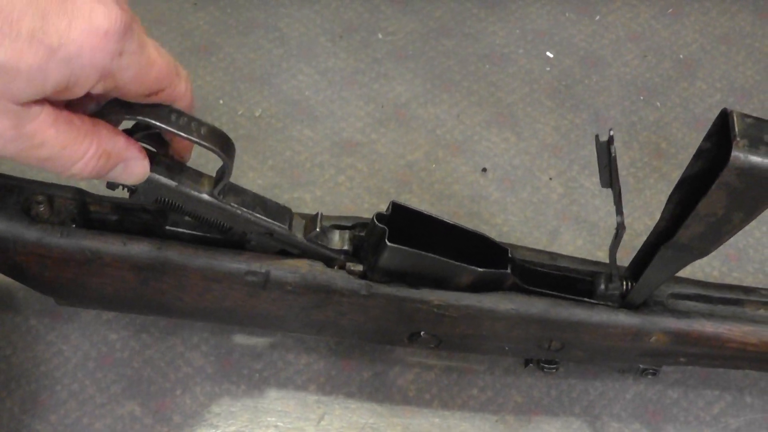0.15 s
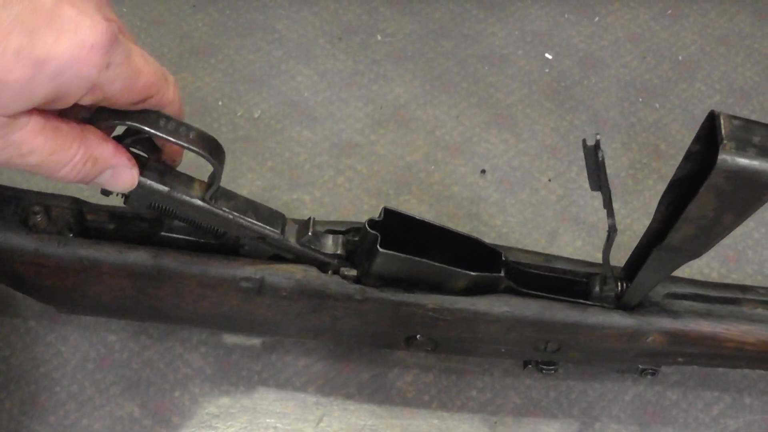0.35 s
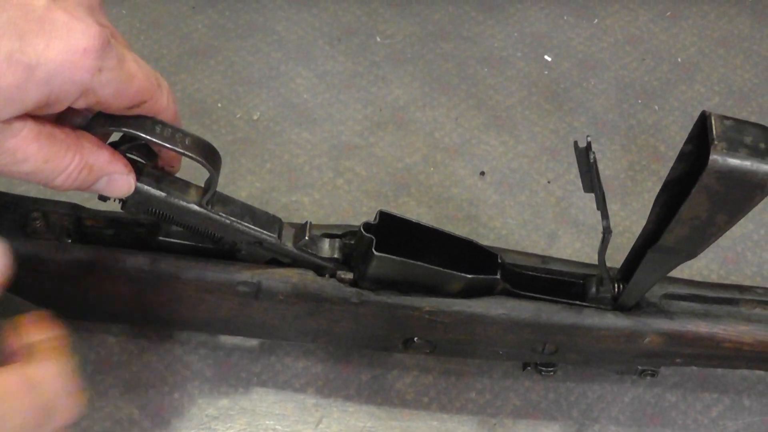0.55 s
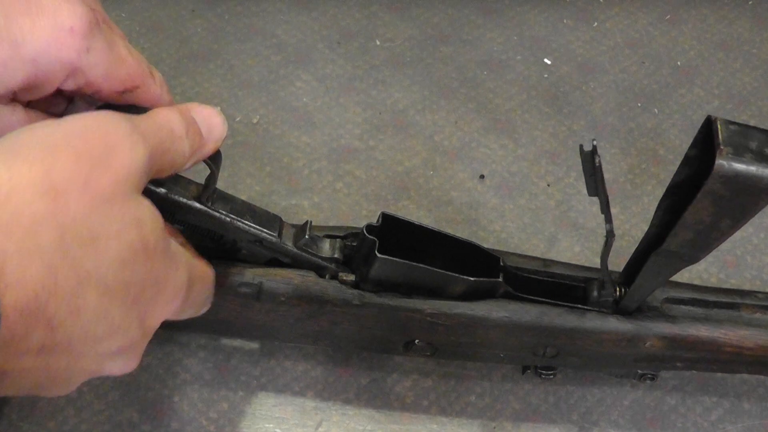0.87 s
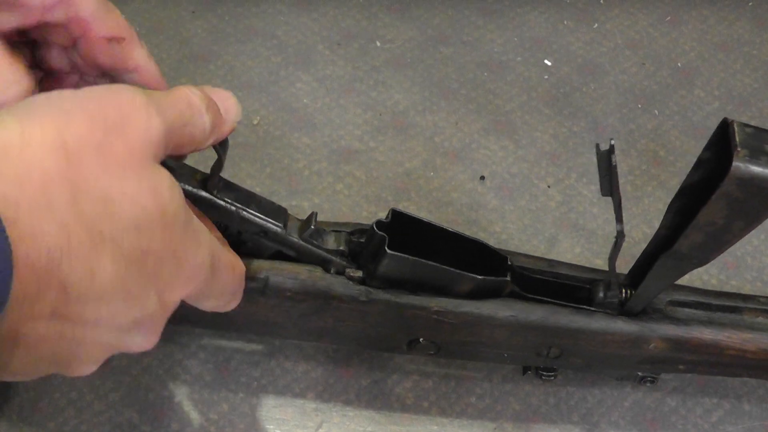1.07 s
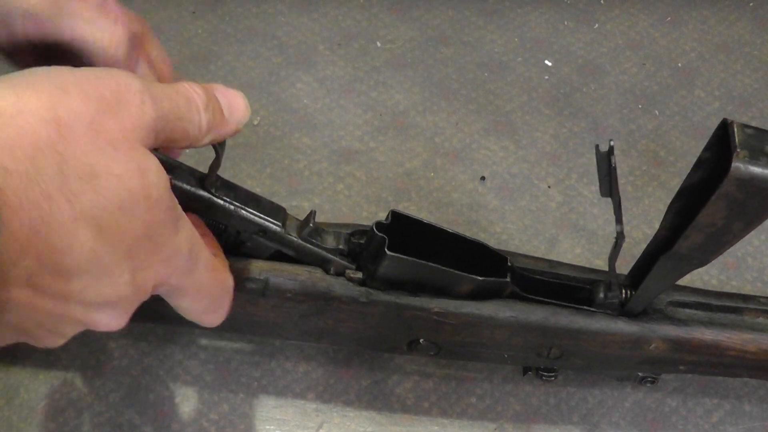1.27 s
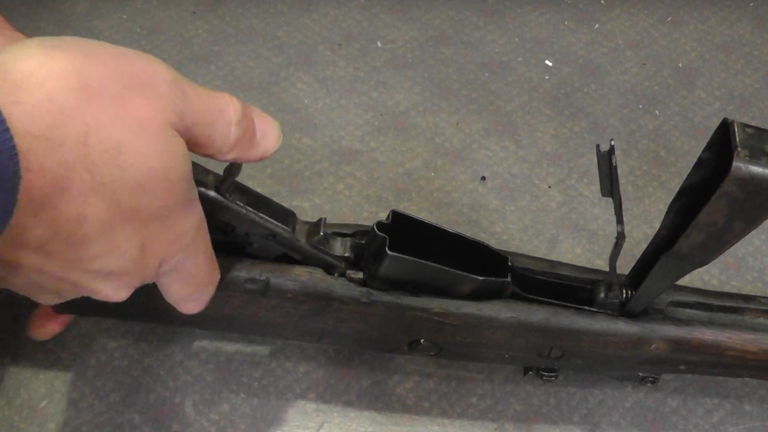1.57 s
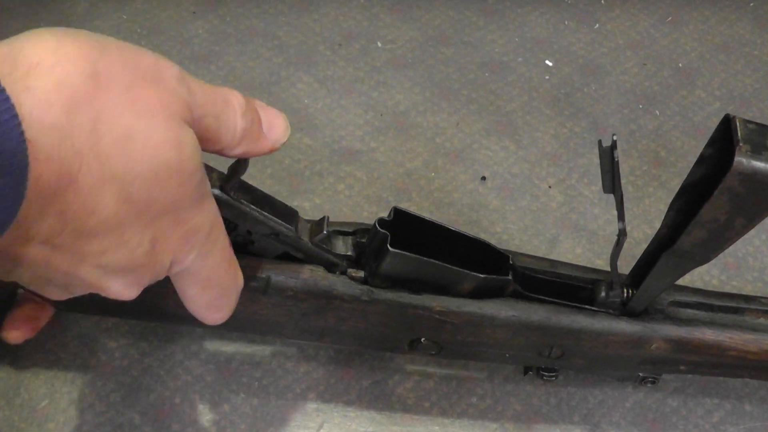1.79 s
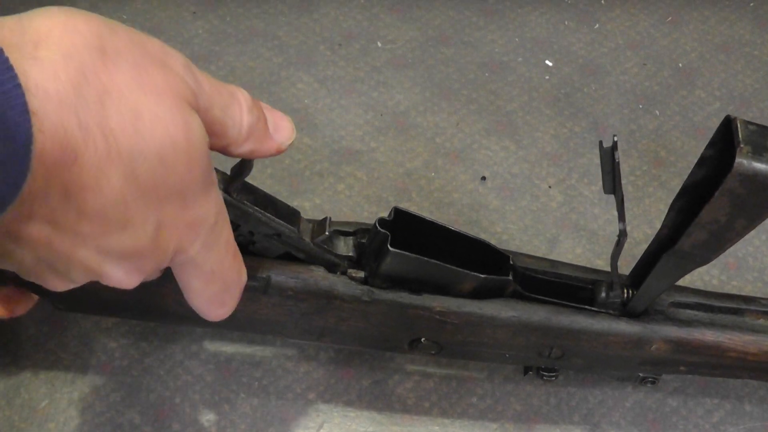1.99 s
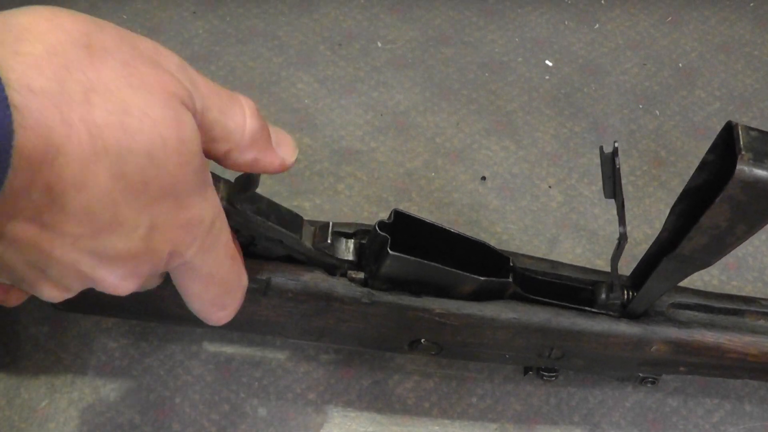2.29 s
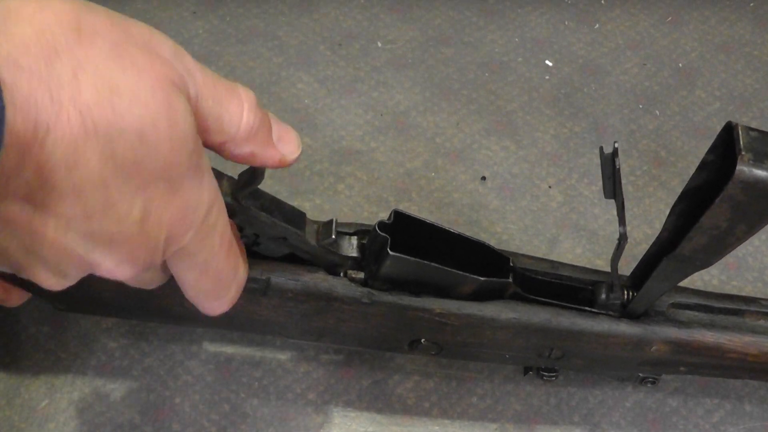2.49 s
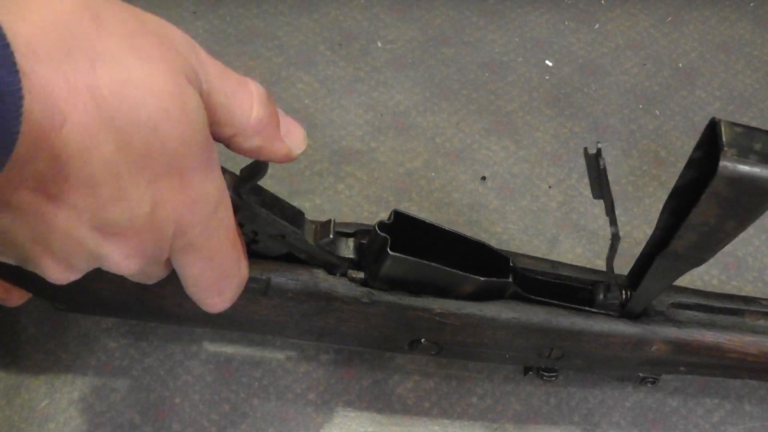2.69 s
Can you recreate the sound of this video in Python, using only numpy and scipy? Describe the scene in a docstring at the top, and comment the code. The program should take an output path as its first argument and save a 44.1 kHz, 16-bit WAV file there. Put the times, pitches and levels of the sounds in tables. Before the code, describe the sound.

A steel trigger assembly is pressed into a wooden rifle stock: soft hand rubbing and dull finger taps, a few light metal clicks midway, then a loud sharp double clack at the end, close stereo microphone, small room.

```python
"""Steel on steel: a trigger assembly is worked by hand into a wooden rifle stock, seating with a sharp double clack.
Each contact is a burst of coloured noise, two edge resonances and decaying modes of the frame and trigger parts.
Bumps and finger taps are struck modes; rubbing hands and sliding steel are filtered stick-slip friction.
A sleeve swishes past as noise that brightens as it gets louder.
All this excites a small room, over a faint soft background noise and still air."""
import sys
import numpy as np
from scipy import signal
from scipy.fft import rfft, irfft, next_fast_len
from scipy.io import wavfile
from scipy.ndimage import map_coordinates

SR = 44100
rng = np.random.default_rng(int(sys.argv[2]) if len(sys.argv) > 2 else 0)


def wrap_up_sound(samples):
    """Save the sound to the file named by the first command line argument, as 16-bit audio."""
    columns = np.atleast_2d(samples).T
    # keep every value between -1 and 1, then stretch to whole-number steps
    tamed = np.clip(columns, -1, 1)
    steps = np.round(tamed * 32767).astype(np.int16)
    wavfile.write(sys.argv[1], SR, steps)


N = 125685

# Steel contacts: start_s, rise_s, crack_t60_s, crack_db, tilt_db_per_octave, frame_db, trigger_db,
# then the two touching edges: edge_hz, edge_db, other_hz, other_db
CONTACTS = [(0.969, 0.00029, 0.0026, -27.5, 4, -66, -63, 8100, -22, 3500, -36),
            (1.417, .002, 0.036, -52, -4, -68, -75, 1170, -48, 850, -41.5),
            (1.4861, 0.0033, 0.043, -29.5, -4, -58, -66, 2000, -35.5, 1100, -26.5),
            (1.522, 0.003, 0.057, -36.5, -9, -50, -68, 1500, -41.5, 955, -53),
            (1.537, 0.0017, 0.026, -33.5, -10, -48, -68, 1540, -44, 1170, -44),
            (1.574, 0.00046, 0.03, -23.5, 0, -34.5, -61, 8950, -28, 4120, -31.5),
            (1.7385, 0.0003, 0.025, -29, 15, -51, -53, 7000, -31.5, 5000, -43),
            (1.836, 0.0011, 0.028, -58, 4, -60, -58, 7560, -46.5, 4600, -54),
            (2.39, 0.00073, 0.022, -48, -28.5, -57.5, -73, 9100, -47.5, 9600, -57),
            (2.456, .001, .015, -59, 4, -67, -70, 8700, -50, 7400, -59),
            (2.524, 0.0013, 0.1, -48, 0, -57, -70, 1280, -47.5, 850, -59),
            (2.56, 0.00069, 0.02, -40, 8, -60, -64, 895, -41.5, 8900, -47),
            (2.586, 0.0017, 0.041, -47, 15, -51, -60, 8500, -41.5, 9200, -50),
            (2.599, 0.0013, 0.089, -43, -5, -42, -56, 2000, -38, 1230, -41.5),
            (2.6094, 0.0021, 0.0084, -22.5, 3.5, -51, -29, 7800, -26, 2020, -40),
            (2.62, .0015, 0.056, -44, 2, -46, -50, 3240, -42, 675, -46),
            (2.706, 0.00072, 0.01, -9, 7.5, -28, -13.5, 10300, -11.5, 8100, -28),
            (2.7155, 0.00071, 0.014, -28, 1, -34, -40, 10500, -41, 4600, -36),
            (2.728, 0.00036, 0.059, -31, -14, -32, -25, 9300, -41, 7000, -37),
            (2.7424, 0.0019, 0.031, -10.5, 7.5, -29, -44, 2117, -18, 6700, -21)]
# Spectrum of a crack before its tilt: pitch_hz, level_db
CRACK_SPECTRUM = [(100, -51), (500, 4), (1400, 5.5), (1800, -3.5), (2200, 3), (3000, -0.5), (3900, -0.5),
                  (7000, -10.5), (10800, -14), (11800, -21.5), (15600, -25.5)]
# Modes of the steel frame and magazine box: pitch_hz, level_db, t60_s
FRAME_MODES = [(1470, -12, .1), (2020, -10, .08), (2170, -8, .08), (2465, -3, .1), (3343, -6, .11),
               (3600, -10, .11), (4010, -7, .09), (4175, -5, .11), (4694, -5, .06), (5230, -4, .06),
               (6370, -3, .09), (6525, -4, .09), (6917, -3, .06), (7285, -6, .08), (8150, -8, .05),
               (9090, -2, .045), (10730, -4, .055), (13550, -9, .045)]
# Modes of the trigger parts: pitch_hz, level_db, t60_s
TRIGGER_MODES = [(3160, -13, .066), (3725, -12, .05), (3957, -14, .06), (4613, -12, .06), (5468, -4, .05),
                 (5605, 0, .06), (6770, -12, .06), (8830, -4, .025), (10300, 1, .017), (10520, 2, .02),
                 (10720, 1, .017)]
# Left-right balance of the steel contacts: pitch_hz, left_over_right_db
STEEL_BALANCE = [(110, 1), (380, -7), (1290, 4.5), (2380, 2.5), (4400, -0.5), (8000, -1), (10500, 3),
                 (13000, -1)]
# Stereo width of cracks, pings, struck modes and jolts: pitch_hz, side_over_mid_db
STEEL_WIDTH = [(40, 12), (130, -11.5), (300, -9.5), (1300, -11), (2500, -14), (4000, -22), (6800, -30),
               (8500, -8), (15000, -12)]
RATTLE_T60_S, RATTLE_MAX_DB = 0.04, -21.5  # level relative to the crack, less after a short crack
PING_Q, PING_BLUR_CYCLES = 11.6, 4

# Bumps into the stock: start_s, rise_s, level_db, strongest_near_hz
BUMPS = [(1.152, 0.015, -35.5, 435), (1.491, 0.0064, -34, 177), (1.523, 0.0099, -32, 252),
         (1.575, 0.0094, -29, 236), (1.742, 0.0061, -37, 249), (1.764, 0.0044, -40.5, 353),
         (2.394, 0.019, -37, 148), (2.553, 0.00053, -39, 780), (2.606, 0.0044, -44, 195),
         (2.704, 0.00088, -35, 700), (2.744, 0.00092, -31, 228)]
# Modes of the wooden stock: pitch_hz, level_db, t60_s
STOCK_MODES = [(150, -5, .12), (178, 0, .16), (235, -5, .12), (291, 0, .18), (431, -3, .17), (507, -6, .16),
               (640, -9, .12), (780, -10, .12), (965, -10, .14)]
# Jolts of the whole rifle on seating: start_s, level_db, fades_below_hz
SEATING_JOLTS = [(2.706, -21.5, 300), (2.744, -19, 129)]
# Spectrum of a jolt: pitch_hz, level_db
JOLT_SPECTRUM = [(20, 2), (55, 19), (110, 18), (200, 6.5), (320, -5), (700, -3), (1500, -56), (5000, -65)]
BUMP_DB_PER_OCTAVE = 11
JOLT_RISE_S, JOLT_T60_S = 0.0033, 0.039

# Steel sliding on steel: start_s, rise_s, hold_s, release_s, level_db
SLIDES = [(2.533, 0.021, 0.0045, 0.019, -49.5), (2.592, 0.012, 0.0033, 0.039, -38.5)]
# Spectrum of sliding steel: pitch_hz, level_db
SLIDE_SPECTRUM = [(300, 9), (1200, 5), (2100, 15), (3000, -1), (6000, 3), (9000, 10.5), (12000, -37),
                  (15500, -6)]

# Dull finger taps: start_s, level_db, left_over_right_db
TAPS = [(0.626, -31, 19), (0.6591, -32.5, 23), (0.8322, -24, 14)]
# Modes of a fingertip knock: pitch_hz, level_db, t60_s
TAP_MODES = [(360, -2, .018), (560, 0, .014), (1000, -3, .009), (1500, -1, .008), (1980, -2, .008)]
TAP_RISE_S = 0.001

# Hands rubbing on the stock: start_s, rise_s, hold_s, release_s, rasp_db, rasp_treble_db,
# stock_resonance_db, left_over_right_db
RUBS = [(0, 0.003, 0.0085, 0.03, -76, 4, -44, -4), (0.336, 0.024, 0.12, 0.47, -57, 2, -47, -1.5),
        (0.395, 0.0031, 0.011, 0.092, -35, -7.5, -46.5, -4),
        (0.452, 0.007, 0.0092, 0.068, -37.5, -1, -60, 1), (0.495, 0.027, 0.014, 0.05, -43.5, 0.5, -63, 10),
        (0.609, 0.068, 0.019, 0.58, -47, 5.5, -55, 18.5), (0.954, 0.084, 0.05, 0.11, -39, 0.5, -37.5, -5),
        (1.1, 0.02, .028, 0.041, -37, 0.5, -43.5, -3), (1.138, 0.021, 0.01, 0.18, -59, -5, -41.5, 1),
        (1.475, 0.01, 0.07, 0.22, -54, -5, -41.5, -2), (1.722, 0.02, 0.016, 0.1, -47.5, -2, -46, 0),
        (1.853, 0.085, 0.16, 0.17, -59.5, 3, -62, 6.5), (2.201, 0.028, 0.0085, 0.25, -62, 9, -56.5, 6),
        (2.514, 0.013, 0.076, 0.14, -52, -4, -53, 2)]
# Spectrum of the rasp: pitch_hz, level_db
RASP_SPECTRUM = [(60, -47), (200, -11), (300, -6), (480, 3), (750, -9), (1500, -3), (2100, -6.5),
                 (2600, -14.5), (4000, -17), (7000, -23.5), (10000, -33.5), (16000, -42)]
# Presses that swell the rifle's lowest resonance: start_s, rise_s, hold_s, release_s, level_db
PRESSES = [(0, 0.0043, 0.038, 0.24, -50), (0.287, 0.016, 0.13, .15, -64), (0.502, .02, 0.03, 0.29, -49.5),
           (0.881, 0.021, 0.02, 0.12, -44.5), (1.026, 0.047, 0.15, 0.32, -44.5),
           (1.536, 0.017, 0.037, 0.83, -53.5)]
RASP_TREBLE_HZ = 2400
BOOM_HZ, BOOM_WIDTH_HZ = 101, 28
SLIPS_PER_S, SLIP_SCATTER_DB = 2200, 2
GRIP_RATE_HZ, GRIP_DB = 70, 1.5

# Level of the passing sleeve: time_s, level_db
SLEEVE_LEVEL = [(.1, -75), (.38, -71), (.5, -48.5), (.7, -42), (.9, -51), (.95, -60), (1.13, -58),
                (1.22, -61), (1.5, -53), (1.68, -59), (1.95, -56.5), (2.14, -68.5)]
# Spectrum of the swish: pitch_hz, level_db
SWISH_SPECTRUM = [(200, -5), (600, 7), (1500, -2.5), (3000, -1), (4500, -4.5), (6800, 0.5), (9500, -6.5),
                  (12000, -10), (15500, -15)]
# Spectrum of the treble fizz: pitch_hz, level_db
FIZZ_SPECTRUM = [(5000, -40), (9000, 1), (12000, 4), (15500, 4)]
FIZZ_PEAK_DB, FIZZ_DB_PER_SWISH_DB, FIZZ_LAG_S = -45.5, 1.6, 0.046

# Reverberation time of the room: pitch_hz, t60_s
ROOM_T60 = [(100, 0.99), (600, 0.46), (2000, 0.21), (6000, 0.22), (14000, 0.12)]
# Colour of the room's tail: pitch_hz, level_db
ROOM_COLOUR = [(100, -1.5), (350, 2), (650, 4), (1200, 2), (4000, 2), (15000, -4)]
ROOM_DB = -13
# Stereo width of friction, cloth, room and background: pitch_hz, side_over_mid_db
WIDTH = [(60, -23), (120, -11), (240, -10), (480, -6.5), (950, -2.5), (1890, -4), (3770, -10.5),
         (7520, -5.5), (15000, 4)]

# Level of the faint soft background noise: time_s, level_db
SOFT_NOISE_LEVEL = [(0, -50), (.35, -45), (.9, -54.5), (1.35, -55), (1.7, -57.5), (2.0, -61.5),
                    (2.15, -62.5), (2.75, -59)]
# Spectrum of the soft noise: pitch_hz, level_db
SOFT_NOISE_SPECTRUM = [(40, -26), (100, 3), (250, 8), (800, -2.5), (2400, 2), (4500, -16), (7000, -17.5),
                       (10000, -33), (16000, -67)]
# Spectrum of the still air: pitch_hz, level_db
AIR_SPECTRUM = [(25, -38), (60, -13), (115, 13), (200, -4.5), (600, 1), (1200, -13.5), (2500, -26),
                (4500, -17.5), (7000, -13.5), (10000, -16.5), (15800, -18)]
AIR_DB = -58

# Dips in the microphone's response: pitch_hz, half_width_hz, gain_db
MIC_NOTCHES = [(1800, 95, -43.5), (2346, 102, -38), (3086, 76, -13)]
TOP_HZ = 15950


def contacts():
    """Impact: a contact cracks, pings at both edges, rattles briefly and rings the frame and trigger modes."""
    out, t = np.zeros((2, N)), np.arange(SR // 4) / SR
    for (start, rise, t60, crack_db, tilt, frame_db, trigger_db,
         edge_hz, edge_db, other_hz, other_db) in CONTACTS:
        crack = amp(crack_db) * noise(CRACK_SPECTRUM, len(t), tilt, STEEL_WIDTH)
        crack += amp(edge_db) * ping(edge_hz, t60, len(t))
        crack += amp(other_db) * ping(other_hz, t60, len(t))
        rattle = amp(RATTLE_MAX_DB - 60 * t / RATTLE_T60_S) * min(t60 / 0.041, 1)
        blow = crack * (amp(-60 * t / t60) + rattle)
        blow += amp(frame_db) * ring(FRAME_MODES, t)
        blow += amp(trigger_db) * ring(TRIGGER_MODES, t)
        add(out, start, blow * np.clip(t / rise, 0, 1))
    return filtered(out, lambda hz: pan(along(STEEL_BALANCE, hz))[:, 0])


def ping(hz, t60, size):
    """Damped resonance: a touching edge sounds one broad band, the broader the briefer the touch."""
    width = 2 * hz / PING_Q + PING_BLUR_CYCLES / t60
    source = rng.standard_normal((2, size))
    return unit(spread(filtered(source, lambda f: resonance(f, hz, width) ** 2), STEEL_WIDTH))


def ring(modes, t):
    """Modal decay: struck modes die exponentially, varying a little from blow to blow and ear to ear."""
    hz, db, t60 = np.transpose(modes)[:, :, None]
    phase = rng.uniform(0, 2 * np.pi, hz.shape)
    lead = np.arctan(amp(along(STEEL_WIDTH, hz))) * rng.choice([-1, 1], hz.shape)
    decay = amp(db + rng.normal(0, 1, hz.shape) - 60 * t / t60)
    ears = [(decay * np.sin(2 * np.pi * hz * t + phase + ear * lead)).sum(0) for ear in (1, -1)]
    return np.array(ears) / np.sqrt(np.sum(amp(db) ** 2) / 2)


def bumps():
    """Modal excitation: a bump favours stock modes near one pitch; seating also jolts the whole rifle."""
    out, t = np.zeros((2, N)), np.arange(SR // 3) / SR
    for start, rise, db, centre in BUMPS:
        modes = [(hz, level - BUMP_DB_PER_OCTAVE * abs(np.log2(hz / centre)), t60)
                 for hz, level, t60 in STOCK_MODES]
        add(out, start, amp(db) * ring(modes, t) * np.clip(t / rise, 0, 1))
    for start, db, low_hz in SEATING_JOLTS:
        push = noise(JOLT_SPECTRUM, len(t), 0, STEEL_WIDTH)
        push = unit(filtered(push, lambda f: f * f / (f * f + low_hz ** 2)))
        add(out, start, amp(db - 60 * t / JOLT_T60_S) * np.clip(t / JOLT_RISE_S, 0, 1) * push)
    return out


def slides():
    """Sliding friction: steel scrapes along steel just before it seats."""
    scrape = unit(spread(filtered(slips(), lambda hz: amp(along(SLIDE_SPECTRUM, hz)))))
    return sum(amp(db) * stroke(*shape) for *shape, db in SLIDES) * scrape


def taps():
    """Heavy damping: fingers land with short, dead knocks."""
    out, t = np.zeros((2, N)), np.arange(SR // 10) / SR
    for start, db, pan_db in TAPS:
        knock = np.clip(t / TAP_RISE_S, 0, 1) * ring(TAP_MODES, t)
        add(out, start, amp(db) * knock * pan(pan_db))
    return out


def rubs(boom_pan_db=-4.5):
    """Friction driving resonators: dragging skin rasps, sounds the stock and a low boom underneath."""
    def wood(f):
        """Modal sum: the stock's resonances with alternating signs, each as wide as its decay implies."""
        return sum((-1) ** k * amp(db) * resonance(f, hz, np.log(1000) / np.pi / t60)
                   for k, (hz, db, t60) in enumerate(STOCK_MODES))

    rasp = unit(spread(filtered(slips(), lambda hz: amp(along(RASP_SPECTRUM, hz)))))
    treble = filtered(rasp, lambda hz: 1 - 1 / (1 + (hz / RASP_TREBLE_HZ) ** 10))
    body = unit(spread(filtered(slips(), wood)))
    boom = unit(spread(filtered(slips(), lambda f: resonance(f, BOOM_HZ, BOOM_WIDTH_HZ) ** 2)))
    rubbing = np.zeros((2, N))
    for *shape, rasp_db, treble_db, body_db, pan_db in RUBS:
        shaded_rasp = rasp + (amp(treble_db) - 1) * treble
        drag = amp(rasp_db) * shaded_rasp + amp(body_db) * body
        rubbing += stroke(*shape) * drag * pan(pan_db)
    pressure = sum(amp(db) * stroke(*shape) for *shape, db in PRESSES)
    return rubbing + pressure * boom * pan(boom_pan_db)


def slips():
    """Stick-slip: tiny jerks of uneven size over a smooth hiss, wavering as the grip catches and gives."""
    size = amp(SLIP_SCATTER_DB * rng.standard_normal(N))
    jerks = (rng.random(N) < SLIPS_PER_S / SR) * size * rng.choice([-1, 1], (2, N))
    grip = map_coordinates(rng.standard_normal(N // 20), [np.arange(N) * GRIP_RATE_HZ / SR])
    return (unit(jerks) + 0.87 * rng.standard_normal((2, N))) * amp(GRIP_DB * grip)


def stroke(start, rise, hold, release):
    """Contact pressure: it builds linearly, holds, then decays by 30 dB per release time."""
    t = np.arange(N) / SR - start
    return np.clip(t / rise, 0, 1) * amp(-30 * np.clip(t - rise - hold, 0, None) / release)


def sleeve(pan_db=2):
    """Cloth friction: a swish slightly to the left whose lagging treble fizz grows faster than its level."""
    level_db = curve(SLEEVE_LEVEL)
    lagged_db = curve([(s + FIZZ_LAG_S, db) for s, db in SLEEVE_LEVEL])
    fizz_db = FIZZ_PEAK_DB + FIZZ_DB_PER_SWISH_DB * (lagged_db - level_db.max())
    swish = amp(level_db) * noise(SWISH_SPECTRUM, N)
    return (swish + amp(fizz_db) * noise(FIZZ_SPECTRUM, N)) * pan(pan_db)


def room(x):
    """Reverberation: a diffuse tail, 5 ms late, in which each frequency dies at its own speed."""
    hz, t, z = signal.stft(rng.standard_normal((2, SR // 2)), SR, nperseg=256)
    decay_db = along(ROOM_COLOUR, hz)[:, None] - 60 * t / along(ROOM_T60, hz)[:, None]
    tail = spread(signal.istft(z * amp(decay_db), SR, nperseg=256)[1])
    delayed = np.pad(x.mean(0), (SR // 200, 0))[None]
    return signal.fftconvolve(delayed, tail / np.linalg.norm(tail[0]), axes=1)[:, :N]


def soft_noise():
    """Amplitude modulation: coloured noise with a slowly moving level."""
    return amp(curve(SOFT_NOISE_LEVEL)) * noise(SOFT_NOISE_SPECTRUM, N)


def air():
    """Stationary noise: still air has a steady level and spectrum."""
    return amp(AIR_DB) * noise(AIR_SPECTRUM, N)


def noise(spectrum, size, tilt=0, width=WIDTH):
    """Spectral shaping: coloured stereo noise of rms 1, tilted in dB per octave above the bass."""
    def response(hz):
        """Spectral tilt: the slope takes hold around 1 kHz."""
        return amp(along(spectrum, hz) + tilt * np.log2(1 + (hz / 1000) ** 2) / 2)

    return unit(spread(filtered(rng.standard_normal((2, size)), response), width))


def spread(pair, width=WIDTH):
    """Mid-side stereo: two unrelated signals become left and right, with a width for each frequency."""
    side = filtered(pair[1], lambda hz: amp(along(width, hz)))
    return np.array([pair[0] + side, pair[0] - side])


def pan(db):
    """Level difference between ears: left and right gains."""
    return amp([[db / 2], [-db / 2]])


def resonance(f, hz, width):
    """Second-order resonator: response of one band-pass resonance of a given bandwidth."""
    return 1j * f * width / (hz * hz - f * f + 1j * f * width)


def filtered(x, response):
    """Linear filtering: the spectrum of x times a response of frequency."""
    n = x.shape[-1]
    m = next_fast_len(n + 8192)
    return irfft(rfft(x, m) * response(np.fft.rfftfreq(m, 1 / SR)), m)[..., :n]


def add(track, start, sound):
    """Superposition: mix a sound in at a time."""
    i = max(round(start * SR), 0)
    track[:, i:i + sound.shape[1]] += sound[:, :max(N - i, 0)]


def along(points, hz):
    """Logarithmic pitch scale: interpolate (Hz, value) points on it."""
    f, v = np.transpose(points)
    return np.interp(np.log(hz + 1), np.log(f + 1), v)


def curve(rows):
    """Linear interpolation: (s, value) points give one value per sample."""
    return np.interp(np.arange(N) / SR, *np.transpose(rows))


def amp(db):
    """Decibel scale: level to amplitude gain."""
    return 10 ** (np.asarray(db) / 20)


def unit(x):
    """Mean power: scale to rms 1."""
    return x / np.sqrt(np.mean(x ** 2) + 1e-20)


def scene():
    """Superposition: rifle and hands, their reverberation, a faint soft noise and still air."""
    near = contacts() + bumps() + slides() + taps() + rubs() + sleeve()
    return near + amp(ROOM_DB) * room(near) + soft_noise() + air()


def record(dry):
    """Frequency response: the microphone has a few narrow dips and a steep upper band limit."""
    def dips(f):
        """Notch filtering: each dip subtracts part of a resonance."""
        return np.prod([1 - (1 - amp(db)) * resonance(f, hz, 2 * half_width)
                        for hz, half_width, db in MIC_NOTCHES], axis=0)

    return filtered(filtered(dry, dips), lambda hz: 1 / (1 + (hz / TOP_HZ) ** 160))


dry = scene()
out = record(dry)
wrap_up_sound(out)
```